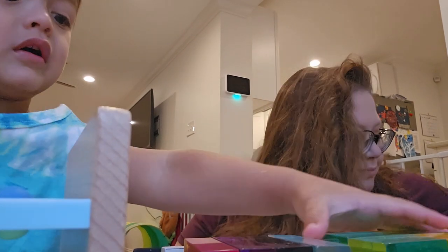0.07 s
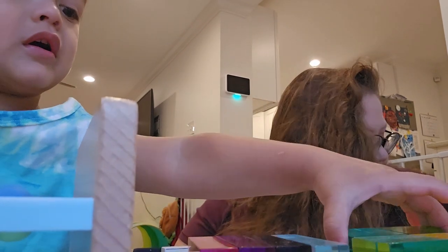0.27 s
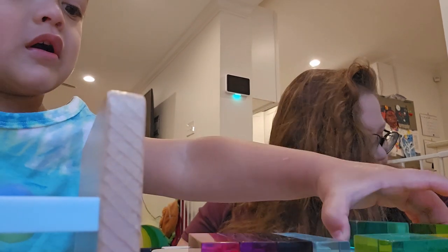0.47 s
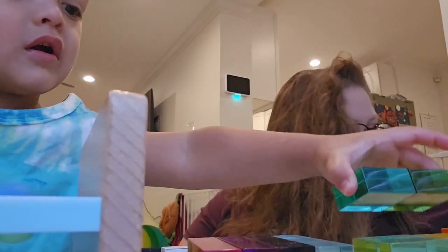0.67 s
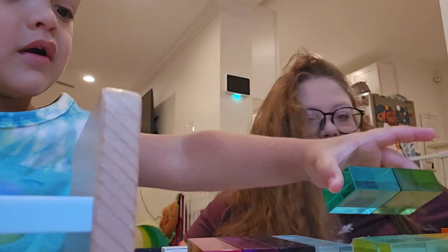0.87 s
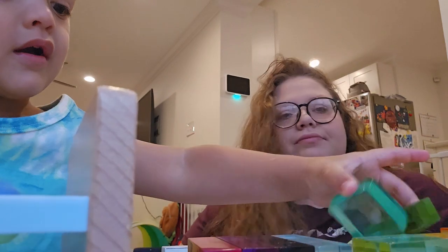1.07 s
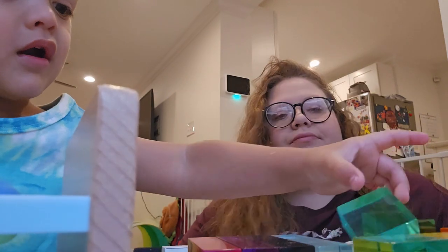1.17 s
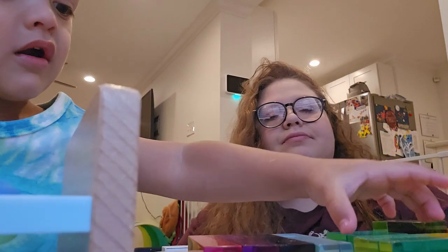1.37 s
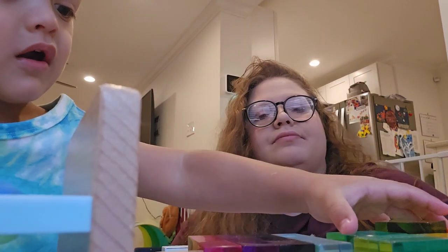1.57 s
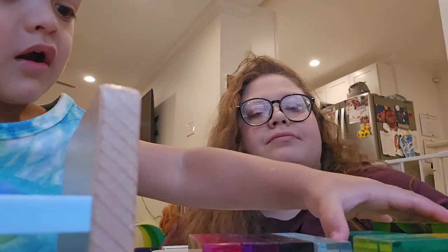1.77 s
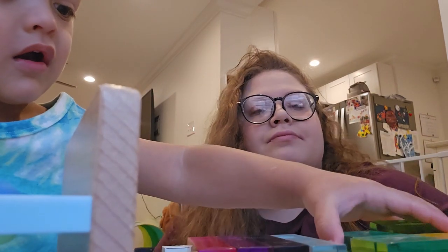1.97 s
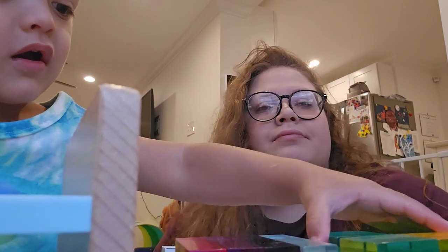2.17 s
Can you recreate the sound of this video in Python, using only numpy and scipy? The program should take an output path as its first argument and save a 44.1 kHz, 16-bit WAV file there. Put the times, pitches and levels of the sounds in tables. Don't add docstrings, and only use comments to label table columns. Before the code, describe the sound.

Plastic toy blocks clack together, lifted and dropped in a clattering tumble on a hollow wooden tabletop

```python
import sys
import numpy as np
from scipy import signal
from scipy.fft import rfft, irfft
from scipy.io import wavfile
from scipy.ndimage import uniform_filter1d

SR = 44100
rng = np.random.default_rng(int(sys.argv[2]) if len(sys.argv) > 2 else 0)


def wrap_up_sound(samples):
    columns = np.atleast_2d(samples).T
    tamed = np.clip(columns, -1, 1)
    steps = np.round(tamed * 32767).astype(np.int16)
    wavfile.write(sys.argv[1], SR, steps)


def rack_gain(trim_db):
    fader = np.asarray(trim_db, float)
    return 10 ** (fader / 20)


N = 98166


def evened(x):
    return x / np.sqrt(np.mean(x ** 2) + 1e-20)


def read(points, hz):
    f, value = np.transpose(points)
    return np.interp(np.log(hz + 1), np.log(f + 1), value)


def add(mix, s, sound):
    part = mix[round(s * SR):][:len(sound)]
    part += sound[:len(part)]


def noise(spectrum, patchy_db, size):
    # (frequency [Hz], likeness [-1..1])
    likeness = [(60, 0.96), (380, 0.58), (2380, 0.16), (15000, 0.16)]
    frames = 4 * N // size + 5
    hz = np.fft.rfftfreq(size, 1 / SR)
    a, b, c, d, patches = rng.standard_normal((frames, len(hz), 5)).T
    patches = uniform_filter1d(patches, size=6, axis=0)
    patches = evened(uniform_filter1d(patches, size=8, axis=1))
    same = np.clip(read(likeness, hz), -1, 1)[:, None]
    left = a + 1j * b
    right = same * left + np.sqrt(1 - same ** 2) * (c + 1j * d)
    level = rack_gain(read(spectrum, hz)[:, None] + patchy_db * patches)
    z = np.array([left, right]) * level
    return evened(signal.istft(z, nperseg=size, noverlap=3 * size // 4)[1][:, :N])


def air():
    # (frequency [Hz], density [dB per Hz])
    hiss = [(20, -3), (120, -2.5), (170, -11), (600, -27.5), (1200, -35), (5000, -50), (6500, -56),
            (8300, -46), (10500, -70.5)]
    # (frequency [Hz], level [dB rms])
    hum = [(58, -45.5), (119.5, -48), (245, -61.5)]
    t = np.arange(N) / SR
    out = rack_gain(-40.5) * noise(hiss, patchy_db=-0.5, size=2048)
    for hz, db in hum:
        waver = evened(uniform_filter1d(rng.standard_normal(N), size=3000))
        out = out + rack_gain(db + 4.0 + 2.86 * waver) * np.sin(2 * np.pi * hz * t + 0.27 * waver)
    return out


def rub(strokes, spectrum, size):
    t = np.arange(N) / SR
    level = np.zeros(N)
    for start, rise, hold, t60, db in strokes:
        fall_s = np.maximum(t - start - rise - hold, 0)
        level += np.clip((t - start) / rise, 0, 1) * rack_gain(db - 60 * fall_s / t60)
    return level * noise(spectrum, patchy_db=3.0, size=size)


def slides():
    # (start [s], rise [s], hold [s], release t60 [s], level [dB])
    strokes = [
        (0.019, 0.044, 0.0057, 0.27, -41),
        (0.748, 0.024, 0.01, 0.37, -35),
        (0.46, 0.024, 0.035, 0.28, -63.5),
        (0.86, 0.012, .01, .02, -47),
        (0.935, 0.018, 0.079, .2, -59.5),
        (1.75, 0.073, 0.023, 0.21, -61),
        (1.4, 0.16, 0.0058, 0.071, -49),
        (0.55, 0.16, .01, 0.098, -49),
    ]
    # (frequency [Hz], density [dB per Hz])
    scrape = [(350, -32), (600, 1.5), (1430, -2), (1640, -6.5), (1980, 1.5), (2680, -3), (14900, -14.5),
              (16000, -23.5)]
    return rub(strokes, scrape, size=256)


def ring(modes, t, luck, detune=0.038, spread_db=0.0):
    out = 0
    for k, (hz, db, t60) in enumerate(modes):
        level = rack_gain(db + spread_db * luck[k] - 60 * t / t60)
        struck_hz = hz * (1 + detune * luck[-1 - k])
        out = out + level * np.sin(2 * np.pi * struck_hz * t + luck[k + 10])
    return out


def knock(db, hz, bright_db, luck, dice):
    # (frequency [Hz], level [dB], t60 [s])
    block = [(1400, -33.5, 0.038), (1600, -18.5, 0.047), (1805, -33.5, 0.015), (2262, -15, 0.038),
             (3090, -26, 0.041)]
    # (frequency [Hz], level [dB])
    crack_colour = [(500, -12.5), (1000, -4), (2200, -1.5), (3400, -1), (4800, 7), (6800, 2.5),
                    (10000, -11), (16500, -19)]
    # (pitch share, overtone [dB], octave [dB])
    port_view = [(1.03, -4, -11.5), (.97, -16, -15)]
    contact_s, snap_s = 0.000706, 0.000798
    bright_from_hz, bright_full_hz = 3360, 5650
    apart = 1
    t = np.arange(len(dice)) / SR
    f = np.fft.rfftfreq(len(dice), 1 / SR)
    climb = np.log((f + 1) / bright_from_hz) / np.log(bright_full_hz / bright_from_hz)
    bright = bright_db * np.clip(climb, 0, 1)
    colour = rack_gain(read(crack_colour, f) + bright + 0.19 * bright_db)
    hits = abs(dice[:, 0]) < 4000 / SR
    taps = dice[:, 1] * hits * rack_gain(-21 - 60 * t / 0.085)
    press = np.minimum(t / contact_s, 1)
    late = np.exp(-2j * np.pi * f * snap_s)
    snap = irfft(rack_gain(15) * colour * late / (1 + (bright_from_hz / (f + 1)) ** 2), len(t))
    snap = snap * np.sin(np.pi * np.minimum(t / (2 * snap_s), 1)) ** 2
    out = []
    for port, (share, over_db, octave_db) in enumerate(port_view, start=3):
        turn = 2 * np.pi * share * hz * (t - contact_s)
        partials = np.cos(turn) + rack_gain(over_db) * np.cos(1.301 * turn) + rack_gain(octave_db) * np.cos(1.92 * turn)
        click = rack_gain(-60 * t / 0.009) * partials
        grit = rfft(dice[:, 2]) + apart * rfft(dice[:, port]) / (1 + (f / 5500) ** 2)
        crack = irfft(grit * colour, len(t)) * rack_gain(10.5 - 60 * t / 0.016)
        body = (click + ring(block, t, luck)) * press + snap
        port_taps = taps * (1 + apart * dice[:, port])
        chatter = signal.fftconvolve(port_taps, body + 4 * snap)[:len(t)]
        out.append(body + crack * press + chatter)
    return rack_gain(db + 2.5) * np.transpose(out)


def thump(modes, db, luck):
    t = np.arange(SR // 4) / SR
    return rack_gain(db) * (1 - np.exp(-t / 0.0035)) * ring(modes, t, luck, detune=0.03, spread_db=2.5)


def blocks(dry):
    # (time [s], peak [dB], block pitch [Hz], table thump [dB], edge brightness [dB]) single knocks,
    # # wall returns 10 ms after some (0.234, 0.684 s), and light grazes while the hand gropes and lifts
    knocks = [(0.136, -11, 1568, -18, -18.5), (0.224, -23.5, 1570, -13, -11.5),
              (0.234, -24, 1500, -8.5, -26), (0.247, -18, 1675, -14, -9.5), (0.37, -13.5, 650, -10, -12),
              (0.3729, -12.5, 2350, -6, -27), (0.431, -22, 670, -4, -14), (0.544, -37, 2080, -10.5, -25),
              (0.613, -46.5, 2150, -7, -18), (0.674, -2.5, 1742, -26, -20.5),
              (0.684, -27.5, 2200, -17.5, -32.5), (0.964, -36, 2140, -8, -39),
              (0.361, -31, 3870, -6.5, -20.5),
        (0.6685, -20, 2030, -2.5, -16.5),
        (0.7542, -35, 1870, 2.5, -20),
        (0.768, -26.5, 700, -1.5, -28),
        (.777, -34, 1800, -2.5, -25.5),
        (0.785, -36, 2340, -0.5, -28.5),
        (0.817, -37, 2320, -6.5, -28),
        (.808, -31, 2240, -7.5, -29.5),
    ]
    # (1.226, 1.401 s)
    tumble = [(1.182, -8, 1333, -22.5, -19.5), (1.186, -7, 912, -17.5, -12.5),
              (1.195, -17.5, 944, -5.5, -20.5), (1.2071, -18.5, 2810, -17, -6.5),
              (1.218, -4, 1014, -12, -11), (1.226, -22.5, 3200, -1, -3.5), (1.2402, -16.5, 1663, -4, -11.5),
              (1.252, -16, 783, -14, -27), (1.278, -10, 1568, -21, -26), (1.2852, -11, 1675, -9.5, -22.5),
              (1.2943, -11, 1580, -25, -13.5), (1.307, -15.5, 1490, -14, -16.5),
              (1.311, -15, 895, -16, -19.5), (1.322, -11.5, 1572, -42, -17),
              (1.3387, -14, 1433, -17, -25.5), (1.371, -21.5, 1277, -21.5, -37.5),
              (1.374, -12.5, 1743, -17.5, -30.5), (1.385, -26, 1600, -13, -12),
              (1.393, -6.5, 2036, -42.5, -14.5), (1.401, -17, 2296, -20, -33.5),
              (1.425, -13.5, 2413, -31.5, -15), (1.44, -5.5, 1730, -18.5, -3.5),
              (1.449, -20, 1780, -13, -1)]
    settle = [
        (1.583, -29, 1763, 0, -17.5),
        (1.6134, -26, 2500, -22.5, -24),
        (1.806, -47.5, 1720, 5, -13),
        (1.846, -39.5, 1740, -14, -28),
        (2.002, -20.5, 1600, -4.5, -21),
        (2.0414, -33, 1510, 4, -30.5),
        (2.0861, -11.5, 3450, -19.5, -10.5),
    ]
    # (0.382, 2.011, 2.096 s)
    rattles = [(.143, -25.5, 2390, -14, -29), (0.25, -17.5, 4100, -21, -34), (.314, -33.5, 845, -26, -30.5),
               (0.382, -23, 4130, -19, -46), (.386, -22, 1430, -17, -31.5), (0.393, -33, 3280, 7, -16.5),
               (.434, -29.5, 2185, -13, -15), (0.445, -27, 1700, -3.5, -31.5),
               (.693, -28.5, 1837, -11, -28.5), (1.19, -18, 2847, -18.5, -26.5),
               (1.222, -14.5, 763, -6, -17.5), (1.233, -22, 914, -9, -25.5),
               (1.275, -24, 1280, -17.5, -34.5), (1.289, -17, 1717, -10.5, -17.5),
               (1.296, -14.5, 3190, -26, -19.5), (1.302, -14, 980, -20, -23),
               (1.316, -24.5, 1740, -2.5, -14), (1.328, -16, 1720, -14, -19),
               (1.344, -21.5, 1484, -18, -29), (1.349, -21, 1600, -12, -29), (1.358, -34.5, 1518, -14, -24),
               (1.399, -16, 3560, -31.5, -22.5), (1.41, -20, 2404, -21.5, -20),
               (1.416, -26, 3370, -9, -21.5), (1.456, -19.5, 1800, -21.5, -9.5),
               (1.589, -30, 1600, -15.5, -30), (1.592, -32, 1490, -5, -40),
               (1.617, -29.5, 1600, -22, -27.5), (1.622, -39, 3210, -11, -37),
               (2.011, -30.5, 1600, -6, -31), (2.05, -43, 2220, -2, -33.5), (2.062, -39.5, 897, 0, -33),
               (2.07, -35, 2200, 3, -32), (2.088, -9.5, 1630, -19, -24), (2.096, -22.5, 3650, -12, -24.5),
               (2.103, -27, 1600, -26, -31)]
    # (frequency [Hz], level [dB], t60 [s])
    table = [(160.5, -8, 0.069), (246.7, -1.5, 0.094), (260.9, -4, 0.11), (306.5, -2.5, 0.087),
             (370, -7, 0.082), (410.8, -5.5, 0.092), (693.3, -3, 0.065), (751, -0.5, 0.034),
             (828, -11.5, 0.082), (960, -2, 0.014)]
    for s, db, hz, thump_db, bright_db in knocks + tumble + settle + rattles:
        own, other = rng.standard_normal((2, 24))
        click = knock(db, hz, bright_db, own, rng.uniform(-1, 1, (4000, 5)))
        add(dry, s + 0.00034, click)
        lucks = own, own + 0.7 * other
        boom = [thump(table, db + thump_db + 2, luck) for luck in lucks]
        add(dry, s, np.transpose(boom))


def jolts(dry):
    # (time [s], level [dB])
    blows = [
        (0.251, -37),
        (0.37, -16),
        (0.43, -26),
        (0.674, -22.5),
        (0.769, -23),
        (1.192, -28.5),
        (1.593, -27),
        (2.005, -22),
        (2.05, -25.5),
        (2.073, -30.5),
    ]
    # (frequency [Hz], level [dB], t60 [s])
    frame = [(49.7, -11.5, 0.49), (83.1, -6.5, 0.23), (108.9, 0.5, 0.088), (154, -4, 0.18)]
    for s, db in blows:
        add(dry, s, thump(frame, db, rng.standard_normal(24))[:, None])


def drags():
    # (start [s], rise [s], hold [s], release t60 [s], level [dB])
    strokes = [
        (.27, 0.0256, 0.026, .3, -34.5),
        (.76, 0.015, 0.16, 0.99, -44.5),
    ]
    # (frequency [Hz], density [dB per Hz])
    skin = [(120, -3), (250, 4.5), (800, -3), (1500, -44)]
    return rub(strokes, skin, size=1024)


def wall(x):
    # (delay [s], level [dB])
    echoes = [(.0094, -10.5), (.0098, -11.5)]
    return np.array([rack_gain(db) * np.pad(x, (round(s * SR), 0))[:N] for s, db in echoes])


def ports(x):
    # (frequency [Hz], left over right [dB])
    lean_points = [(60, 3), (300, 8.5), (700, 1), (1400, 1.5), (2800, 3), (5000, 6), (14000, 1)]
    # (frequency [Hz], left leads by [radians])
    lead_points = [(60, 0), (1500, 0), (2300, -1.6), (3400, -2.4), (4700, -2.6), (6000, -5.6), (8000, -6.2),
                   (16000, -6.3)]
    hz = np.fft.rfftfreq(N, 1 / SR)
    lean = rack_gain(0.5 * read(lean_points, hz))
    lead = np.exp(1j * read(lead_points, hz))
    return irfft(rfft(x) * np.array([lean * lead, 1 / lean]), N)


def room(x):
    # (frequency [Hz], t60 [s])
    decay = [(150, 0.6), (400, 0.36), (1000, .35), (3000, 0.44), (8000, 0.29), (14000, 0.29)]
    # (frequency [Hz], level [dB])
    tone = [(300, 10.5), (1200, 6), (3000, -2.5), (8000, 7), (14000, 7.5)]
    taps = np.zeros((2, SR))
    at = np.arange(200, SR - 20, 20) + rng.integers(0, 20, (2, (SR - 201) // 20))
    np.put_along_axis(taps, at, rng.choice([-1., 1.], at.shape), 1)
    hz, t, z = signal.stft(taps, SR, nperseg=256)
    level = rack_gain(read(tone, hz)[:, None] - 60 * t / read(decay, hz)[:, None])
    tail = signal.istft(z * level, SR, nperseg=256)[1]
    return signal.fftconvolve(x[None], tail / np.linalg.norm(tail[0]), axes=1)[:, :N]


def scene():
    floor = air() + slides() + drags()
    dry = np.zeros((N, 2))
    blocks(dry)
    jolts(dry)
    middle = dry.mean(1)
    return ports(dry.T + wall(middle)) + rack_gain(-9) * room(middle) + floor


def roll_off(x):
    return signal.sosfilt(signal.butter(12, 16460, fs=SR, output="sos"), x)


def record(dry):
    clipped = 0.79 * np.clip(dry, -1, 1)
    lowpass = signal.firwin(255, 15800, fs=SR)
    band = signal.oaconvolve(clipped, lowpass[None], "same")
    return roll_off(band)


dry = scene()
out = record(dry)
wrap_up_sound(out)
```